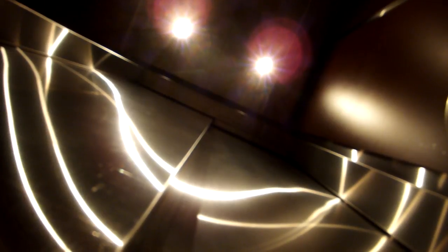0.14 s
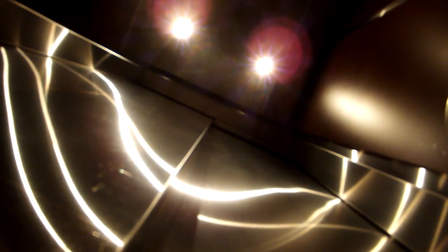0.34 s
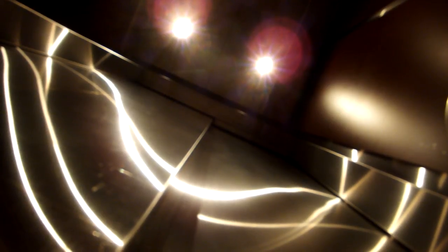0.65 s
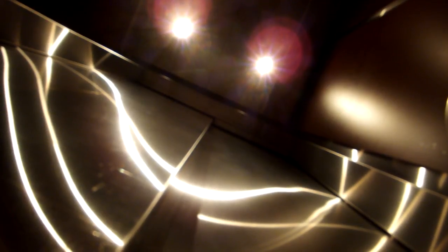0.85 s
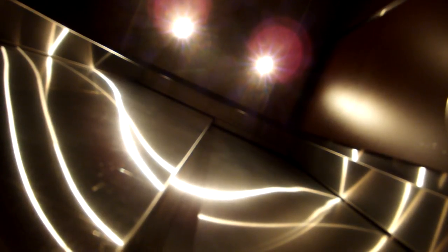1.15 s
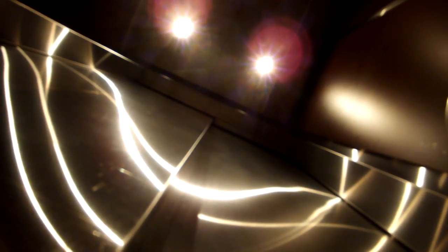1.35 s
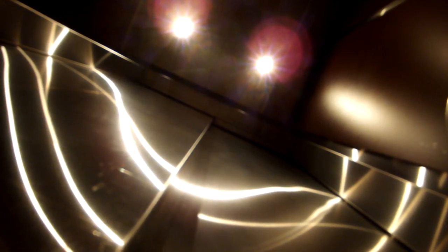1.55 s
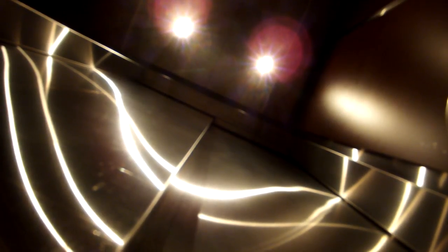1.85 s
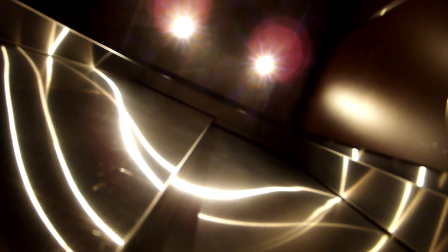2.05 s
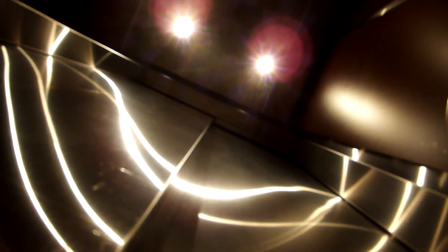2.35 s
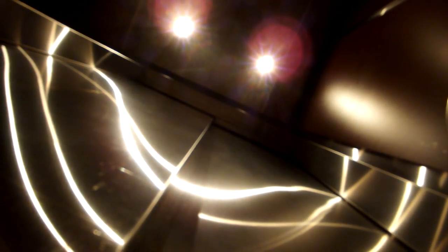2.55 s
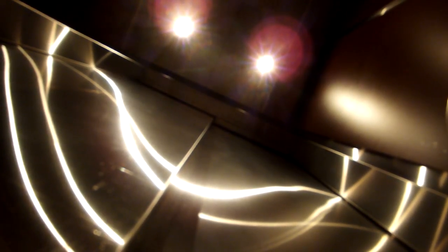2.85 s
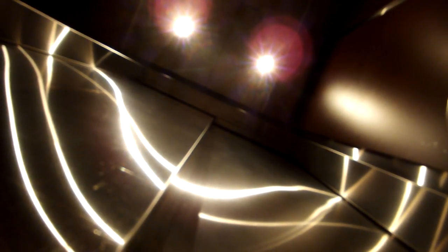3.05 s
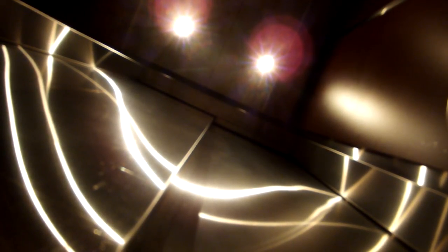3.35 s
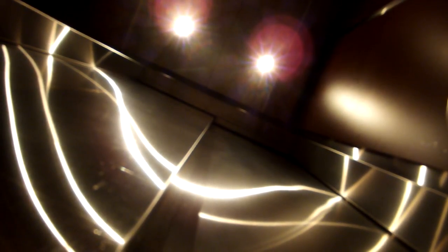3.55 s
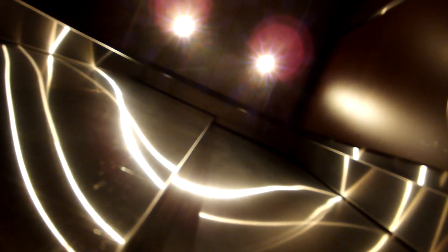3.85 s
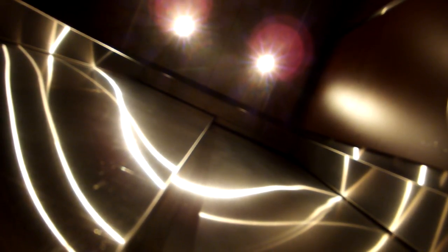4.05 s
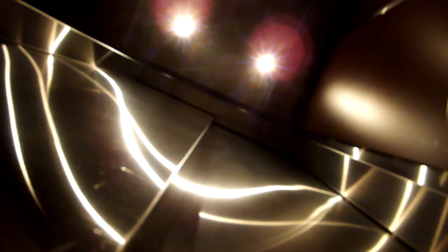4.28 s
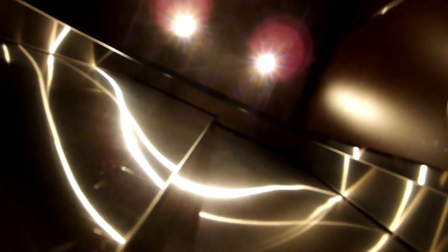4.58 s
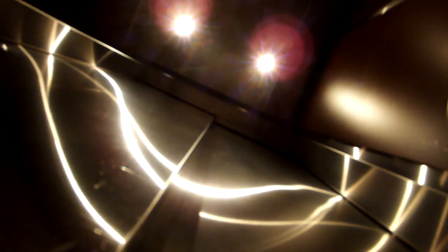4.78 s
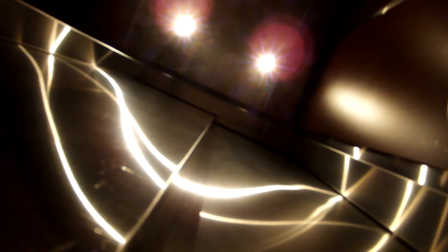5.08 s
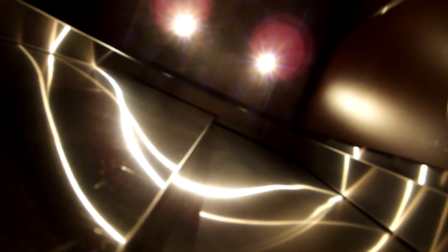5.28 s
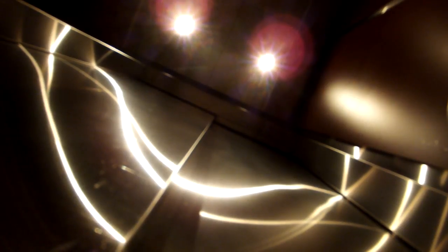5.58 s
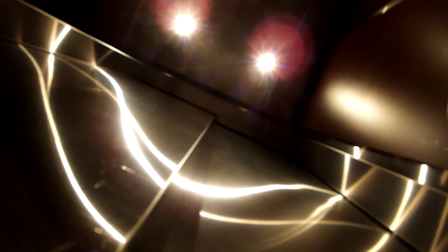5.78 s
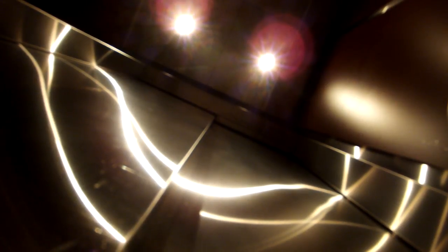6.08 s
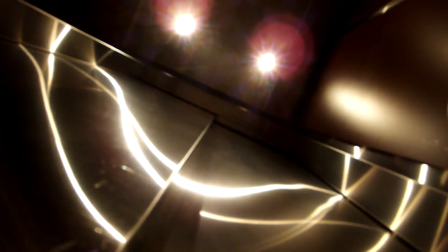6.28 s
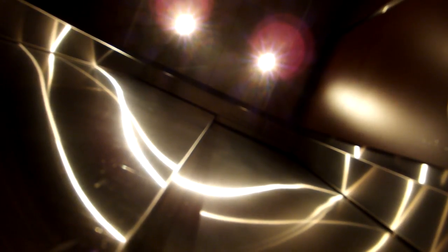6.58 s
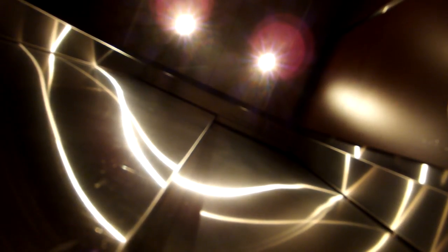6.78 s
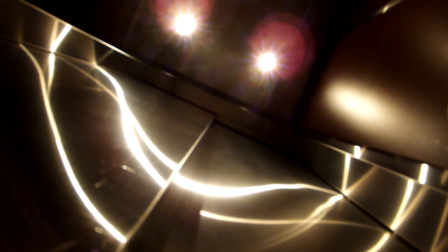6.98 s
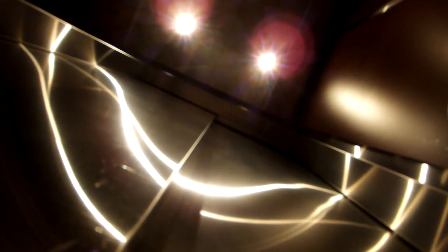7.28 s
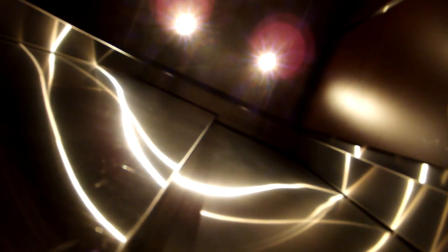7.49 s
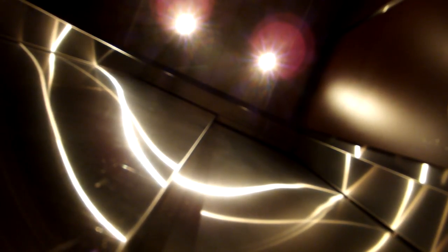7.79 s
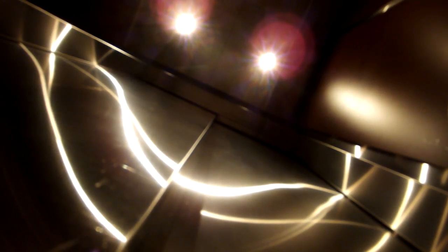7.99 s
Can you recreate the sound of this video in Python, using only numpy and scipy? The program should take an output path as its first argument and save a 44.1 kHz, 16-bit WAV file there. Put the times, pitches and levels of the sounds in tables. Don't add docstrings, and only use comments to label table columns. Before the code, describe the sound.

A steel lift hums and hisses as it travels, while hard falling cracks from the rail joints strike irregularly, each followed by a short reverberant roar.

```python
import sys
import numpy as np
from scipy import signal
from scipy.io import wavfile
from scipy.ndimage import uniform_filter1d

SR = 44100
rng = np.random.default_rng(int(sys.argv[2]) if len(sys.argv) > 2 else 0)


def invert_db(level):
    return 10 ** (np.asarray(level, dtype=float) / 20)


def to_wav(sig):
    pcm = np.clip(np.atleast_2d(sig), -1, 1) * 32767
    pcm = np.round(pcm).astype(np.int16)
    wavfile.write(sys.argv[1], SR, pcm.T)


N = 358533
T = np.arange(N) / SR
COARSE = T[::64]


def read(points, hz):
    f, value = np.transpose(points)
    return np.interp(np.log(hz + 1), np.log(f + 1), value)


def evened(x):
    return x / np.sqrt(np.mean(x ** 2) + 1e-20)


def add(mix, s, sound):
    part = mix[..., round(s * SR):][..., :sound.shape[-1]]
    part += sound[..., :part.shape[-1]]


def spread(x, lean_db=3.5):
    return x * invert_db(np.array([[lean_db / 2], [-lean_db / 2]]))


def colour(points, tilt_db=0, knee=500):
    return lambda hz, t: read(points, hz) + tilt_db * np.log2(1 + hz / knee) + 0 * t


# frequency in Hz, left-right correlation.
SAME = [(30, .93), (80, .98), (500, .99), (3000, .97), (6000, .88), (9000, .89), (13000, .97)]
# frequency in Hz, left minus right in dB.
LEAN = [(30, 6.5), (60, 4.3), (150, 3.6), (1000, 3.9), (3000, 4.8), (5500, 4.2), (8500, -1.4), (14000, -.4)]
# frequency in Hz, phase lead of the left port in radians.
PORTS = [(30, -.3), (120, 0), (2000, -.03), (4400, -.12), (6900, -.5), (9800, 0)]


def noise(field_db, size, count=N, lean=1, patchy_db=0.5):
    hop = size // 4
    hz = np.fft.rfftfreq(size, 1 / SR)[:, None]
    t = np.arange(count // hop + 5) * hop / SR
    a, b, c, d, patch = rng.standard_normal((len(t), len(hz), 5)).T
    patch = uniform_filter1d(patch, size=5, axis=0)
    patch = evened(uniform_filter1d(patch, size=12, axis=1))
    same = np.clip(read(SAME, hz), -1, 1)
    left = a + 1j * b
    right = same * left + np.sqrt(1 - same ** 2) * (c + 1j * d)
    tilt = invert_db(lean * read(LEAN, hz) / 2)
    ports = np.array([left * tilt, right * np.exp(-1j * read(PORTS, hz)) / tilt])
    z = ports * invert_db(field_db(hz, t) + patchy_db * patch)
    return signal.istft(z, nperseg=size, noverlap=size - hop)[1][:, :count]


def wavering(hz, width, steady=.7):
    r = np.exp(-np.pi * width / SR)
    drift = rng.standard_normal((N, 2)) @ [1, 1j]
    for _ in range(2):
        drift = signal.lfilter([1 - r], [1, -r], drift)
    drift = drift / (abs(drift) + 0.44 * np.std(drift)) ** np.clip(steady, 0, 1)
    return evened((drift * np.exp(2j * np.pi * hz * T)).real)


def swells(rows, rest_db, edge=3.1):
    power = sum(invert_db(2 * db) * np.exp(-abs((COARSE - s) / half) ** edge) for s, half, db in rows)
    return 10 * np.log10(np.interp(T, COARSE, power) + invert_db(2 * rest_db))


# time of the blow in seconds, stretch of the bending sweep in seconds.
JOINTS = [(0.1511, .0025), (1.8181, .0024), (2.65, .0026), (4.1648, .0022), (4.8612, .0029),
          (6.3953, .0025), (7.1078, .0025)]


def shudders(peaks_db, holds, rise, fall, rest_db):
    power = 0
    for (s, _), db, hold in zip(JOINTS, peaks_db, holds):
        t = np.maximum(COARSE - s, 0)
        onset = 1 - np.exp(-(t / rise) ** 2)
        decay = np.exp(-2 * np.maximum(t - hold, 0) / fall)
        power = power + invert_db(2 * db) * onset * decay
    return 10 * np.log10(np.interp(T, COARSE, power) + invert_db(2 * rest_db))


# frequency in Hz, level in dB per Hz.
HISS = [(1500, -26), (5000, -11), (9000, -1), (15700, -2)]
# frequency in Hz, level in dB.
WHINE = [(14356, -78), (15610, -77)]
# start in seconds, length in seconds, frequency in Hz, level in dB.
SQUEALS = [
    (2.19, .05, 14640, -60),
    (4.803, .05, 14640, -64),
    (5.07, 0.037, 14640, -62),
    (5.13, 0.13, 14640, -52),
    (5.13, .12, 7320, -66),
    (7.25, 0.037, 14640, -65),
]


def electronics():
    hiss = invert_db(-63.5) * evened(noise(colour(HISS), size=512, lean=0, patchy_db=4))
    tones = sum(invert_db(db) * wavering(hz, 12.0, .4) for hz, db in WHINE)
    for s, length, hz, db in SQUEALS:
        t = T[:round(length * SR)]
        add(tones, s, invert_db(db) * np.sin(2 * np.pi * hz * t) * np.sin(np.pi * t / length))
    return tones + hiss


# frequency in Hz, level in dB per Hz.
RUSH = [(500, -19.5), (1500, 7), (4000, 3), (8000, 2.5), (12000, 3), (15700, -1.5), (16000, -22)]
# frequency in Hz, level in dB per Hz.
SLIDE = [(400, -21), (600, 0), (1000, -6), (2000, -14.5), (4000, -23), (8000, -33), (16000, -44)]
# middle in seconds, half length in seconds, air rush in dB, shoe slide in dB.
GUSTS = [(0.157, 0.058, -56.5, -42), (1.62, 0.21, -63.5, -41.5), (2.342, 0.095, -54, -40),
         (2.643, 0.058, -76, -40), (3.094, 0.15, -54, -39), (3.835, 0.23, -57.5, -41),
         (4.156, 0.047, -56, -42), (2.88, 0.075, -56, -43), (4.62, 0.19, -55, -40), (5.754, 0.13, -64, -47),
         (6, .1, -64.5, -56), (7.904, 0.12, -69, -49), (6.278, .13, -56.5, -39), (6.9, 0.26, -57, -40)]


def air():
    s, half, rush_db, slide_db = np.transpose(GUSTS)
    duck_db = sum(-20 * np.exp(-((T - at - 0.21) / 0.083) ** 2) for at, _ in JOINTS)
    rush_db = swells(zip(s, half, rush_db), -69.5, 2.4) + duck_db
    slide_db = swells(zip(s, 1.33 * half, slide_db), -43, 1.96)
    press_db = slide_db - slide_db.mean()

    def slide_field_db(hz, t):
        brightening = 0.63 * np.log2(1 + hz / 1500)
        return read(SLIDE, hz) + brightening * np.interp(t, T, press_db)

    rush = evened(noise(colour(RUSH), size=512, lean=.7, patchy_db=.4))
    slide = evened(noise(slide_field_db, size=512, patchy_db=0.65))
    return invert_db(rush_db + 7.5) * rush + invert_db(slide_db - 0.5) * slide


# shell in dB, floor boom in dB, deep shake in dB,
# wall panels in dB, hold in seconds.
SHUDDERS = [(-14.5, -14.5, -22, -20.5, 0.38), (-10.5, -18.5, -25.5, -21.5, 0.37),
            (-25, -18, -42, -19.5, 0.3), (-12.5, -20, -25, -21, 0.37), (-12.5, -16, -20.5, -20.5, 0.34),
            (-26, -19.5, -26.5, -25.5, 0.36), (-13, -16, -16.5, -19.5, .36)]
# frequency in Hz, level in dB per Hz.
SHELL = [(130, -45), (180, -8), (215, -2), (260, -2), (295, -4.5), (335, 2.4), (380, -4.5), (450, -9.5),
         (510, -18), (700, -21.5), (1200, -40), (2500, -100)]
# frequency in Hz, width in Hz, level in dB over the rumble.
STRANDS = [(251.2, 5.3, -17), (293, 10, -16), (385.6, 9.4, -16.5), (421, 9.3, -17), (465, 8.6, -23)]
# time in seconds, shell rumble in dB.
LOAD = [(0, -17), (.5, -24.5), (.8, -25), (1, -19), (1.4, -18.5), (1.6, -20.5), (2.3, -21), (3.05, -20.5),
        (3.4, -22), (3.75, -17.5), (4.1, -15.5), (4.7, -22), (5.4, -19.5), (5.8, -21.5), (6.3, -17.5),
        (6.75, -22), (7, -17.5), (8.13, -20)]
# middle in seconds, half length in seconds, level in dB.
SECOND = [(.05, 0.019, -21), (.9, 0.44, -27.5), (1.4, 0.18, -21.5), (1.98, 0.043, -23), (2.3, 0.088, -21.5),
          (3.3, 0.19, -22), (3.9, 0.16, -23), (4.35, 0.14, -15.5), (4.98, 0.088, -21.5),
          (5.52, 0.11, -20.5), (6.5, 0.029, -19.5), (7.2, 0.12, -17), (8.05, .08, -21.5)]
# middle in seconds, half length in seconds, level in dB.
THIRD = [(.11, 0.037, -12), (.96, 0.041, -18.5), (1.3, 0.14, -17.5), (1.76, 0.077, -12.5), (2, 0.2, -21.5),
         (2.6, .07, -12.5), (3.05, 0.28, -21), (3.75, 0.07, -12.5), (4.05, 0.23, -20), (4.32, 0.057, -12.5),
         (4.72, .07, -20), (4.9, 0.11, -18), (5.23, 0.02, -14), (6.18, 0.15, -11.5), (6.7, 0.064, -22.5),
         (7.05, 0.1, -22), (7.5, 0.21, -31), (7.86, 0.072, -14.5)]


def drive():
    struck_db, *_, hold = np.transpose(SHUDDERS)
    load_s, load_db = np.transpose(LOAD)
    shell_db = shudders(struck_db, 0.48 * hold, rise=0.067, fall=0.12, rest_db=np.interp(T, load_s, load_db))
    second_db, third_db = swells(SECOND, -31.5), swells(THIRD, -34.5)
    shell = invert_db(shell_db - 4.5) * evened(noise(colour(SHELL), size=2048))
    tones = invert_db(second_db - 4.0) * wavering(220., 3.5, 0.46)
    tones += invert_db(third_db - 7.5) * wavering(330., 5.5, 1.0)
    tones += sum(invert_db(shell_db + db) * wavering(hz, width, 0.15) for hz, width, db in STRANDS)
    tones += invert_db(-54.5) * wavering(720., 6.2, 0.29)
    return shell + spread(tones)


# frequency in Hz, level in dB per Hz.
SHAKE = [(15, -41), (30, -30.5), (45, -13.5), (60, 2.5), (80, 1.5), (100, -16.5), (140, -51), (250, -96)]
# middle in seconds, half length in seconds, level in dB.
STIRS = [
    (.07, 0.035, -19),
    (.78, 0.042, -20.5),
    (1.12, 0.15, -26),
    (3.28, 0.045, -24.5),
    (3.46, .05, -26),
    (7.72, 0.032, -23),
    (7.95, 0.074, -29),
]


def floor():
    _, boom_db, shake_db, walls_db, hold = np.transpose(SHUDDERS)
    stirs_db = swells(STIRS, -40.5, 1.1)
    linger_db = shudders(boom_db - 8, hold, rise=0.036, fall=0.49, rest_db=stirs_db)
    boom_db = shudders(boom_db, hold, rise=0.036, fall=0.026, rest_db=linger_db)
    shake_db = shudders(shake_db, 0.16 * hold, rise=.012, fall=0.22, rest_db=-33.5)
    walls_db = shudders(walls_db, 0.34 * hold, rise=0.011, fall=0.24, rest_db=-31.5)
    boom = invert_db(boom_db - 4.0) * wavering(101., 11.0, 0.71)
    walls = invert_db(walls_db - 0.35) * wavering(145., 55.3, 1.0)
    shake = evened(noise(colour(SHAKE), size=4096, patchy_db=.8))
    return spread(boom + walls, 4.8) + invert_db(shake_db - 2.4) * shake


# frequency in Hz, level in dB per Hz.
ROAR = [(200, -36.5), (450, 6), (900, -2), (1500, -8.5), (2400, -23), (4500, -23), (7000, -31.5),
        (11000, -45), (16000, -65)]
# frequency in Hz, decay time over 60 dB in seconds.
SHAFT = [(400, 1.4), (1000, 0.79), (2000, 0.58), (4000, 0.62), (7000, 0.62), (12000, 0.12)]
# frequency in Hz, width in Hz, level in dB.
RAIL = [(1460, 160, -8), (2180, 170, -4), (2780, 180, -4), (3330, 200, -6), (4030, 210, -15),
        (4700, 200, -18), (5460, 220, -27)]


def roar(roar_db, build, decay, clang_db, sheet_db, rail_db, clang_hz):
    def field_db(hz, t):
        clang = invert_db(clang_db) * np.exp(-((hz - clang_hz) / 120) ** 2)
        sheet_width = np.where(hz > 3150, 900, 1300)
        sheet = invert_db(sheet_db) * np.exp(-((hz - 3150) / sheet_width) ** 2)
        fading_db = rail_db - 25 * t
        rail = sum(invert_db(fading_db + db) * np.exp(-((hz - f) / width) ** 2) for f, width, db in RAIL)
        colour_db = 20 * np.log10(invert_db(read(ROAR, hz)) + clang + sheet + rail)
        hold = 2.97 * build / (1 + (hz / 5000) ** 2)
        return colour_db - 60 * np.maximum(t - hold, 0) / (decay * read(SHAFT, hz))

    t = T[:round(1.4 * SR)]
    tail = noise(field_db, size=1024, count=len(t), patchy_db=1.4)
    tail = tail / np.sqrt(np.mean(tail[:, :4000] ** 2))
    rattle = invert_db(0.9 * evened(uniform_filter1d(rng.standard_normal(len(t)), size=180)))
    shape = 2.13 * np.exp(-t / 0.012) + 0.41 + .5 * (1 - np.exp(-(t / build) ** 2))
    return invert_db(roar_db) * tail * shape * rattle * (1 - np.exp(-t / 0.0027))


def clank(clank_db):
    t = T[:round(.05 * SR)]
    envelope = np.exp(-t / 0.0029) * (1 - np.exp(-t / 0.0048))
    return spread(invert_db(clank_db) * np.sin(2 * np.pi * 650 * t) * envelope)


def fizz(fizz_db, flash_db, rebound_db):
    t = T[:round(.4 * SR)]
    sizzle = evened(noise(colour(RUSH, -8.3, 3000), size=256, count=len(t), lean=0.87))
    flash = invert_db(flash_db) * np.exp(-((t - .0021) / .0003) ** 2)
    rebound = invert_db(rebound_db) * np.exp(-((t - .0058) / .001) ** 2)
    trim = invert_db(fizz_db) * np.exp(-t / 0.095) * (1 - np.exp(-t / 0.0034))
    return sizzle * (flash + rebound + trim)


# frequency in Hz, level in dB per Hz.
CRACK = [(200, -6), (700, 0), (1500, -4), (3000, -15), (6000, -25), (15000, -38)]


def snap(peak_db, length, bright_db=0):
    burst = evened(noise(colour(CRACK, bright_db), size=256, count=3000))
    t = T[:burst.shape[1]]
    return invert_db(peak_db) * burst * (t / length) * np.exp(1 - t / length)


def blow(stretch, crack_db, thump_db):
    t = T[:round(.12 * SR)]
    hz = 55 + 1550 / (1 + t / stretch) ** 2
    sweep = -np.sin(2 * np.pi * np.cumsum(hz) / SR)
    crack = invert_db(crack_db) * np.exp(-((t - .002) / (.72 * stretch)) ** 2)
    thump = invert_db(thump_db) * np.exp(-t / 0.033)
    return spread(sweep * (crack + thump) * (1 - np.exp(-t / 0.00087)))


CRACKS_DB = [0, -2.5, -2, -2.5, 1.5, -9, 0]
# thump in dB, snap in dB, bracket clank in dB.
KNOCKS = [
    (-10.5, -14, -27),
    (-11.5, -9, -40),
    (-8, -10, -8),
    (-19, -7, -39),
    (-11, -14.5, -16),
    (-11.5, -9.5, -24),
    (-6, -11.5, -2),
]
# fizz in
# dB, flash in dB, rebound flash in dB.
BURSTS = [(-40, -27, -38), (-42, -21, -38), (-35, -27, -50), (-39, -24, -40), (-30.5, -29, -18),
          (-51, -19, -38), (-45, -31, -31)]
# roar in dB, build-up in seconds, decay factor.
ANSWERS = [(-17, 0.042, 1.14), (-19, 0.046, 1.14), (-17, 0.03, 1.05), (-17.5, 0.055, 1.15),
           (-21, 0.063, 0.98), (-21, 0.041, 0.98), (-14.5, 0.061, 0.94)]
# dull clang in dB, bright sheet in dB, rail ring in dB, clang in Hz.
RINGS = [
    (3, -11, -44, 563),
    (-37, -10, -16, 640),
    (8, -34, 0, 663),
    (-15.5, -18, -16, 1000),
    (0, -21, -31, 720),
    (-2, -14, -20, 610),
    (9.5, -37, -16, 678),
]
# start in seconds, peak in dB, length in seconds.
TICKS = [
    (0.601, -45, .003),
    (5.452, -44, 0.003),
    (6.184, -33, 0.01),
    (7.184, -27, .008),
    (7.264, -38, 0.0023),
]


def knocks():
    out = np.zeros((2, N))
    rows = zip(JOINTS, CRACKS_DB, KNOCKS, BURSTS, ANSWERS, RINGS)
    for (s, stretch), crack_db, (thump_db, snap_db, clank_db), trim, answer, ring in rows:
        add(out, s, blow(stretch, crack_db, thump_db))
        add(out, s, snap(snap_db, 0.00081, bright_db=-0.5))
        add(out, s + 0.0036, snap(snap_db - 6.5, 0.0014))
        add(out, s, fizz(*trim))
        add(out, s, clank(clank_db))
        add(out, s, roar(*answer, *ring))
    for s, peak_db, length in TICKS:
        add(out, s, snap(peak_db, length, bright_db=1.0))
    return out


def scene():
    return electronics() + air() + drive() + floor() + knocks()


def band_limit(x):
    return signal.sosfilt(signal.butter(12, 16360, fs=SR, output="sos"), x)


def record(dry):
    low_pass = signal.firwin(511, 15800, window=("kaiser", 9), fs=SR)
    limited = signal.oaconvolve(dry, low_pass[None], "same")
    mix = np.clip(limited, -1, 1)
    return band_limit(mix)


dry = scene()
out = record(dry)
to_wav(out)
```